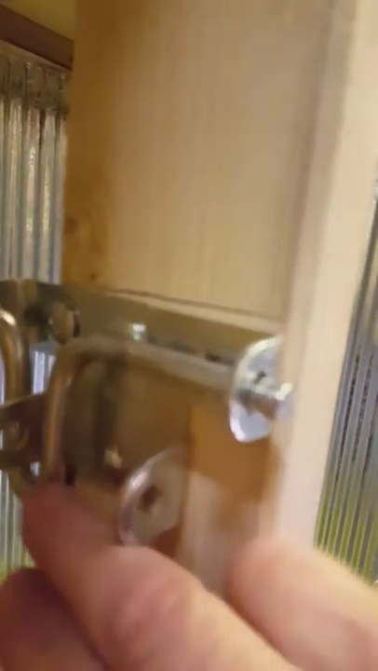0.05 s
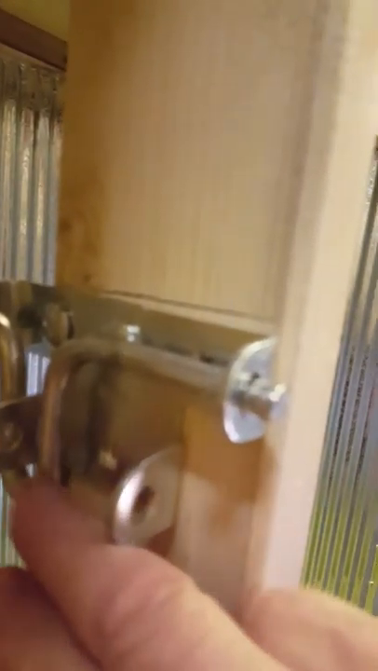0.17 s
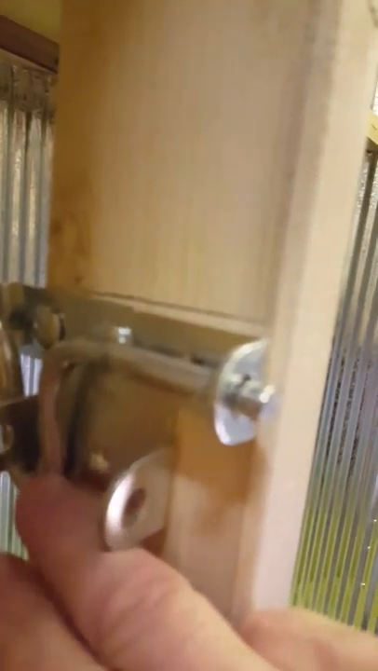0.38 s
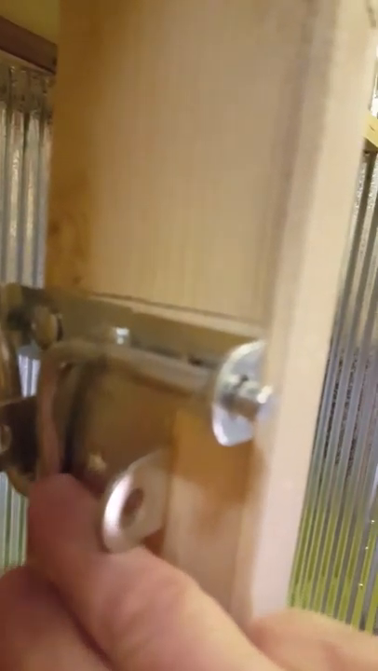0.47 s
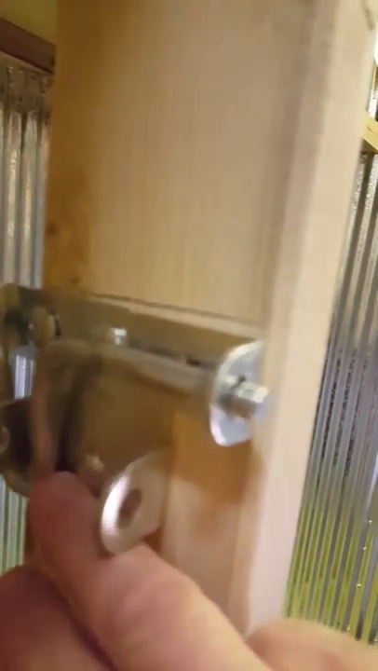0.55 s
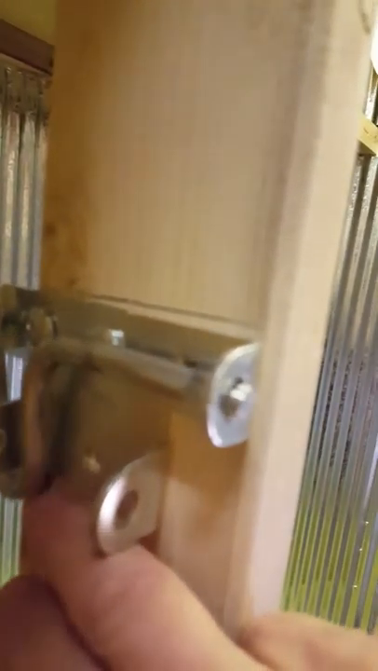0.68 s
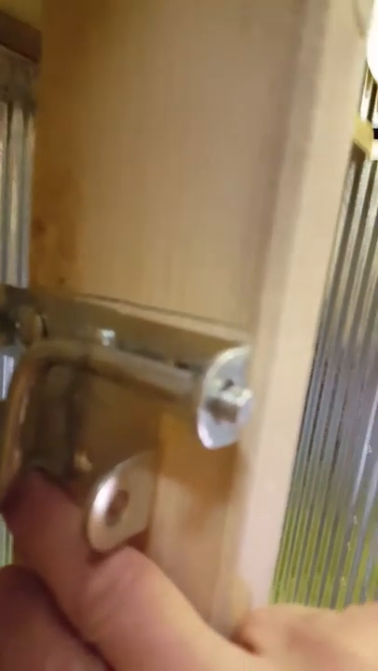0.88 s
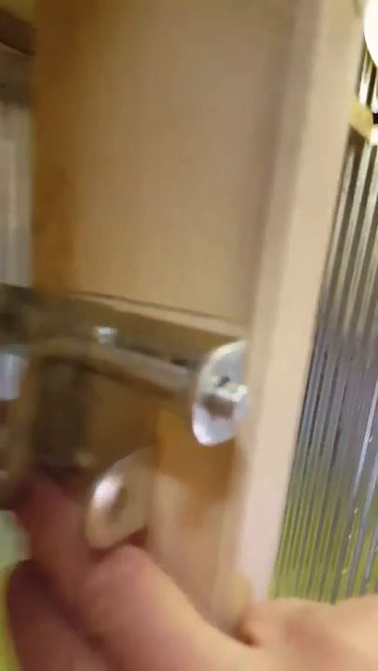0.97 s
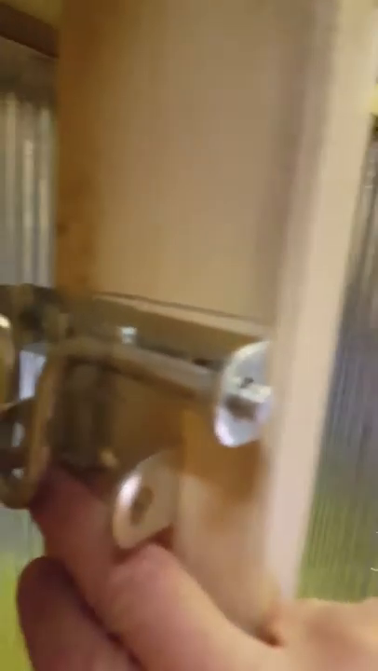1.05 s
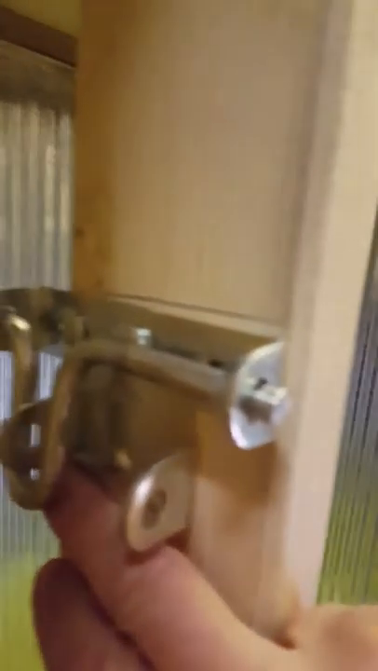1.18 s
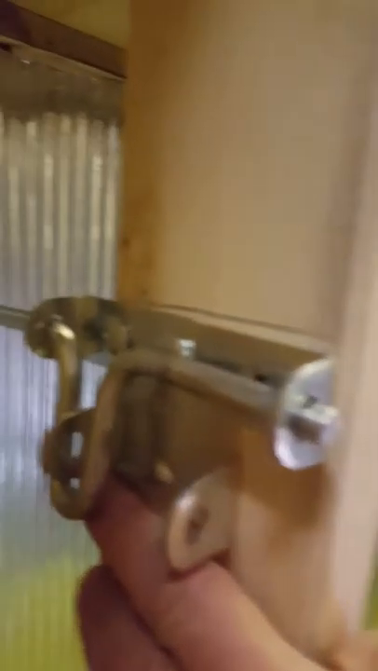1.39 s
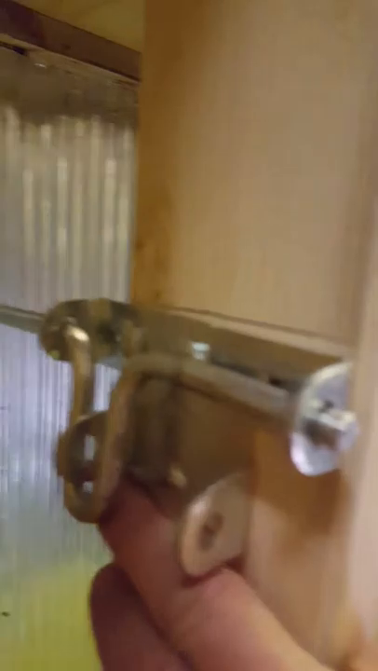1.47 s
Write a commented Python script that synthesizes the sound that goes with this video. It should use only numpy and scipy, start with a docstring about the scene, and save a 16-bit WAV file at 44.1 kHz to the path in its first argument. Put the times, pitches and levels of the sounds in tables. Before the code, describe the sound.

Steel bolt latch snaps sharply against its stop, then rattles, knocks wood and slides; hand rubs follow

```python
"""A steel bolt latch on a wooden gate frame, close to a two-port microphone indoors. A soft low bump opens over
room rumble, faint tones and hiss, all noise and sines. A light tap, then the bolt snaps against its stop: decaying
modes and noise bursts, answered by a small room of dying noise. From about 0.47 s it rattles, knocks the frame and
slides, random slips ringing the same modes. From 0.72 s a hand rubs the wood three times, random grains through broad
resonances; one faint latch tap falls before the last rub."""
import sys
import numpy as np
from scipy import signal
from scipy.fft import rfft, irfft, next_fast_len
from scipy.io import wavfile
from scipy.ndimage import map_coordinates

SR = 44100
rng = np.random.default_rng(int(sys.argv[2]) if len(sys.argv) > 2 else 0)


def voltage_ratio(level):
    """Linear amplitude factor for a level in decibels (scalar or array-like)."""
    return 10 ** (np.asarray(level, float) / 20)


def put_to_file(sound):
    """Save the sound as 16-bit audio at rate SR, in the file named by the first command-line argument."""
    columns = np.atleast_2d(sound).T  # one column per channel
    safe = np.clip(columns, -1, 1)
    whole_steps = np.round(safe * 32767)
    wavfile.write(sys.argv[1], SR, whole_steps.astype(np.int16))


N = 66150

# soft low bump on the microphone
THUMP_S, THUMP_DB, THUMP_HZ, THUMP_T60_S = 0.002, -35, 141, 0.011
# room rumble spectrum, relative: (frequency [Hz], level [dB])
FLOOR_SPECTRUM = [(12, -40), (20, -16), (55, -7), (98, -9.5), (132, -6.5), (398, -15), (450, -12),
                  (484, -12.5), (547, -18), (1320, -23), (1610, -23), (7000, -38.5), (9100, -61),
                  (15400, -120)]
# room rumble over time, before a 2 dB cut: (time [s], level [dB])
FLOOR_LEVEL = [(0.0, -58.5), (0.27, -60), (0.416, -59.5), (0.752, -55.5), (1.198, -61), (1.5, -61)]
# left-right likeness of the room rumble: (frequency [Hz], correlation [-1 to 1])
FLOOR_LIKENESS = [(40, .85), (130, .8), (290, .64), (640, .28), (1400, 0), (15000, 0)]
# faint steady tones, peak level before a 1 dB lift: (frequency [Hz], level [dB])
HUM_TONES = [(118.4, -79), (1362, -83)]
# low handling rumble
RUMBLE_DB, RUMBLE_SWING_DB, RUMBLE_HZ = -71.5, 4, 102
# microphone self-noise spectrum, relative: (frequency [Hz], level [dB])
MIC_HISS = [(3530, -32), (6000, -5.5), (10200, -4.5), (11200, -2), (14900, 2.5), (15900, -5), (16200, -22),
            (16500, -25.5)]
MIC_HISS_DB = -77

# bolt contacts; wood pitch is the one favoured by the spot struck:
# (time [s], steel level [dB], wood level [dB], hardness [Hz], wood pitch [Hz])
CONTACTS = [(0.177, -54, -53.5, 5040, 497), (0.2072, -15, -26.5, 15600, 560),
            (0.2136, -24.5, -43, 7100, 523), (.219, -21.5, -29, 9000, 450),
            (0.227, -29.5, -24.5, 4930, 386), (0.4679, -39, -47, 11850, 691), (.477, -36, -34.5, 8000, 636),
            (.494, -42.5, -47, 3500, 608), (.500, -37, -28, 2850, 620), (.506, -40, -29.5, 2950, 620),
            (0.5212, -47, -27.5, 9000, 419.4), (0.5401, -36, -36, 7900, 530),
            (0.549, -35.5, -36, 5760, 560), (.565, -53, -36, 10000, 420), (.580, -43, -43.5, 2550, 450),
            (0.968, -58, -83, 6050, 500)]
# bolt and plate modes: (frequency [Hz], level [dB], t60 [s])
STEEL_MODES = [(1114, 0.5, 0.077), (1276, -8, 0.08), (1520, -4.5, 0.082), (1861, -5, 0.15),
               (2233, -7.5, 0.11), (2390, -10, 0.07), (2553, -4, .08), (2630, 2, .07), (2910, -5, 0.11),
               (3214, -4, 0.096), (3366, 4, 0.04), (3740, -9, .06), (4020, -3, 0.06), (4760, -16.5, 0.027),
               (5630, -7, 0.03), (6360, -8.5, 0.02), (6420, -10, 0.05), (7160, -16, 0.04),
               (8130, -12, 0.043), (10920, 0, 0.016), (12100, -4.5, 0.012)]
# wooden frame modes: (frequency [Hz], level [dB], t60 [s])
WOOD_MODES = [(359, -13, .1), (398, 0.5, .1), (429.3, -4, 0.11), (465.5, -4, 0.083), (538.7, -8, 0.098),
              (581, -2.5, 0.1), (698, -2.5, 0.07), (879, -11.5, 0.08), (1000, -4.5, 0.15)]
# low modes of the whole gate, moved by the force of the steel blow: (frequency [Hz], level [dB], t60 [s])
GATE_MODES = [(131, -17.5, 0.2), (175.5, -14.5, 0.13), (232.5, -8, 0.25), (272.3, -8.5, 0.19),
              (325, -16, .3)]
# dense plate overtones, relative: (frequency [Hz], level [dB])
CLANK_SPECTRUM = [(290, -44), (500, 3.5), (820, -12.5), (1090, -6), (1370, -16), (1840, -2.5), (6380, -17),
                  (8670, -39), (12000, -18), (15800, -25), (16500, -61)]
# decay of the plate overtones: (frequency [Hz], t60 [s])
CLANK_T60 = [(600, 0.069), (2000, 0.11), (4000, 0.049), (8000, 0.12), (15000, 0.1)]
# decay of the contact click: (frequency [Hz], t60 [s])
CLICK_T60 = [(1000, .012), (14000, 0.0085)]
# stereo lean of the ringing modes: (frequency [Hz], left over right [dB])
LATCH_LEAN = [(60, -1), (110, 4), (200, 3), (380, 2), (700, 0.5), (1290, 0), (2380, 7), (4400, -3),
              (8120, -4.5), (15000, -8)]
STEEL_RISE_S, WOOD_RISE_S, GATE_RISE_S = 0.000081, 0.00058, 0.024
LATCH_LAG_S, WOOD_LAG_S, RUB_LAG_S = .00014, .00009, .00008  # left port behind right
MODE_SCATTER_DB = 2  # from blow to blow
SPOT_SCATTER_S = .00005  # where on the part a mode radiates
DETUNE = .003  # loose parts shift the pitches, as a share of each
BLUR = .004  # rattling joints widen each mode by this share of its pitch
SPOT_OCTAVES = 0.44  # spread of wood pitches favoured by a blow; the slide uses half of it
RADIATES_ABOVE_HZ = 260  # the narrow frame sounds weakly below
CLANK_DB, CLICK_DB, CLANK_LEAN_DB = -7.5, -1, -5.5
# light taps hardly set the plate going: extra dB lost per dB below a hard blow
CLANK_GROWS, HARD_BLOW_DB = 0.22, -14.5

# decay of the room answer: (frequency [Hz], t60 [s])
ROOM_T60 = [(150, 0.41), (350, 0.25), (2000, 0.27), (6000, 0.23), (14000, 0.12)]
ROOM_DB = -15

# the bolt drags through its guide: (time [s], steel level [dB], wood level [dB])
SLIDE = [(.468, -54, -74), (.49, -58, -60), (.56, -60, -58.5), (.60, -73.5, -60.5), (.635, -78.5, -57),
         (.685, -78, -60), (.72, -89, -74)]
SLIPS_PER_S, SLIDE_TOP_HZ = 2000, 3500
SLIDE_WOOD_HZ = (440, 487)  # the struck spot moves along the frame
GRIT_DB = 0  # each slip also clicks

# hand pressure, one list per stroke: (time [s], level [dB])
RUB_STROKES = [
    [(0.72, -70), (0.724, -65), (0.732, -68), (0.75, -67.5), (0.79, -58), (0.84, -77.5)],
    [(0.855, -67.5), (0.875, -53.5), (0.931, -42), (0.939, -45.5), (0.955, -93)],
    [(1.015, -66.5), (1.043, -53), (1.075, -47), (1.125, -67)],
]
# broad resonances of the rubbed wood: (frequency [Hz], width [Hz], level [dB])
RUB_BODY = [(208.5, 20, -2.5), (450, 97, -1.5), (860, 200, 2), (1150, 420, -5), (1446, 220, -10),
            (2950, 920, -26)]
# rubbing hiss spectrum, relative: (frequency [Hz], level [dB])
RUB_HISS = [(1500, -120), (2500, 5.5), (5000, 10), (8500, -8.5), (12500, 4), (16500, -17)]
RUB_HISS_DB, RUB_LEAN_DB, GRAINS_PER_S = -25.5, 8, 3000
RUB_APART = 0.37  # share of each port's own grains beside the common ones

MIC_NOTCH_HZ, MIC_NOTCH_WIDTH_HZ, MIC_NOTCH_DEPTH, MIC_TOP_HZ = 9000, 900, 0.46, 16700


def unit(x):
    """Brings a signal to rms 1."""
    return x / np.sqrt(np.mean(x ** 2) + 1e-20)


def along(points, hz):
    """Reads (Hz, value) points on a log frequency axis."""
    f, v = np.transpose(points)
    return np.interp(np.log(hz + 1), np.log(f + 1), v)


def filtered(x, response):
    """Shapes x by a complex response of frequency."""
    m = next_fast_len(N + SR // 2)
    return irfft(rfft(x, m) * response(np.fft.rfftfreq(m, 1 / SR)), m)[..., :N]


def sides(db):
    """Left and right gains for a lean in dB."""
    return voltage_ratio(np.multiply.outer([.5, -.5], db))


def ports(lag_s, hz):
    """Phase by which the left port hears later than the right."""
    return np.exp(-1j * np.pi * lag_s * hz * np.array([[1], [-1]]))


def dying(t60s, spectrum, channels):
    """Noise that starts at once; each frequency dies at its own speed."""
    noise = rng.standard_normal((channels, SR // 2 + 64))
    hz, t, z = signal.stft(noise, SR, nperseg=64)
    level_db = along(spectrum, hz)[:, None] - 60 * t / along(t60s, hz)[:, None]
    return signal.istft(z * voltage_ratio(level_db), SR, nperseg=64)[1][:, 64:SR // 2 + 64]


def ring(modes, favour, rise_s, lag_s, sense):
    """Stereo ringing of one blow as decaying sines; sense -1 makes neighbouring modes start opposed."""
    hz, db, t60 = np.transpose(modes)[..., None]
    t = np.arange(SR // 2) / SR
    size, spot, shift = rng.standard_normal((3, len(modes), 1))
    hz = hz * (1 + DETUNE * shift)
    decay = voltage_ratio(db + MODE_SCATTER_DB * size - 60 * t / t60)
    sign = sense ** np.arange(len(modes))[:, None]
    gain = decay * favour(hz) * sign * (1 - np.exp(-t / rise_s))
    # a random walk in phase widens each mode
    wander = np.sqrt(2 * np.pi * BLUR * hz / SR) * np.cumsum(rng.standard_normal(gain.shape), 1)
    late = lag_s / 2 + SPOT_SCATTER_S * spot
    left_right = []
    for side, lean in zip((1, -1), sides(along(LATCH_LEAN, hz))):
        tones = np.sin(2 * np.pi * hz * (t - side * late) + wander)
        left_right.append(np.sum(lean * gain * tones, 0))
    return np.array(left_right)


def thump():
    """One low push on the microphone: a sine that dies within milliseconds."""
    t = np.clip(np.arange(N) / SR - THUMP_S, 0, None)
    return -voltage_ratio(THUMP_DB - 60 * t / THUMP_T60_S) * np.sin(2 * np.pi * THUMP_HZ * t)


def floor():
    """Room rumble as shaped noise, near mono in the bass, with faint steady tones."""
    t = np.arange(N) / SR

    def mid_side(hz):
        turn = np.arccos(np.clip(along(FLOOR_LIKENESS, hz), -1, 1)) / 2
        return voltage_ratio(along(FLOOR_SPECTRUM, hz)) * [np.cos(turn), np.sin(turn)]

    mid, side = filtered(rng.standard_normal((2, N)), mid_side)
    noise = unit(np.array([mid + side, mid - side]))
    hum = sum(voltage_ratio(db + 1) * np.sin(2 * np.pi * (hz * t + rng.random())) for hz, db in HUM_TONES)
    return voltage_ratio(np.interp(t, *np.transpose(FLOOR_LEVEL)) - 2.0) * noise + hum


def rumble():
    """A low rumble swells unevenly on random control points; the capsules hiss."""
    swell = map_coordinates(rng.standard_normal(20), [np.arange(N) * 10 / SR])  # 10 points per second
    low = unit(filtered(rng.standard_normal(N), lambda hz: hz / (1 + (hz / RUMBLE_HZ) ** 4)))
    hiss = unit(filtered(rng.standard_normal((2, N)), lambda hz: voltage_ratio(along(MIC_HISS, hz))))
    return voltage_ratio(RUMBLE_DB + RUMBLE_SWING_DB * swell) * low + voltage_ratio(MIC_HISS_DB) * hiss


def latch():
    """Each contact clicks, rings the steel, clanks the plate, knocks the frame and shakes the gate."""
    out, lag = np.zeros((2, N + SR)), round(LATCH_LAG_S * SR)
    narrow = signal.butter(2, RADIATES_ABOVE_HZ, "highpass", fs=SR, output="sos")
    for s, steel_db, wood_db, top_hz, wood_hz in CONTACTS:
        clank = dying(CLANK_T60, CLANK_SPECTRUM, channels=1)[0]
        click = dying(CLICK_T60, CLANK_SPECTRUM, channels=1)[0]
        clank_gain = voltage_ratio(CLANK_DB + CLANK_GROWS * (steel_db - HARD_BLOW_DB))
        noise = clank_gain * clank / np.std(clank[:400]) + voltage_ratio(CLICK_DB) * click / np.std(click[:100])

        # softer contacts lose treble
        band = signal.butter(2, [500, min(top_hz, 20000)], "bandpass", fs=SR, output="sos")
        burst = signal.sosfilt(band, noise)
        burst = sides(CLANK_LEAN_DB)[:, None] * [np.pad(burst, (lag, 0))[:len(burst)], burst]

        steel = ring(STEEL_MODES, lambda hz: .5 / (1 + (hz / top_hz) ** 2),
                     STEEL_RISE_S, LATCH_LAG_S, sense=-1.)
        wood = ring(WOOD_MODES, lambda hz: np.exp(-.5 * (np.log2(hz / wood_hz) / SPOT_OCTAVES) ** 2),
                    WOOD_RISE_S, WOOD_LAG_S, sense=1.)
        gate = ring(GATE_MODES, lambda hz: .5, GATE_RISE_S, WOOD_LAG_S, sense=-1.)
        blow = voltage_ratio(steel_db) * (burst + steel + gate) + voltage_ratio(wood_db) * signal.sosfilt(narrow, wood)
        out[:, round(s * SR):][:, :SR // 2] += blow
    return out[:, :N]


def room(x):
    """A small room answers a few milliseconds late with a tail of dying noise."""
    tail = dying(ROOM_T60, [(100, 0)], channels=2)
    late = np.pad(x, ((0, 0), (250, 0)))
    return signal.fftconvolve(late, tail / np.linalg.norm(tail[0]), axes=1)[:, :N]


def slide():
    """Tiny random slips click and ring the same steel and frame modes."""
    t, (s, steel_db, wood_db) = np.arange(N) / SR, np.transpose(SLIDE)
    slips = (rng.random((2, N)) < SLIPS_PER_S / SR) * rng.standard_normal((2, N))
    steel = ring(STEEL_MODES, lambda hz: 1 / (1 + (hz / SLIDE_TOP_HZ) ** 4),
                 STEEL_RISE_S, LATCH_LAG_S, sense=-1.)
    near, far = (ring(WOOD_MODES, lambda hz: np.exp(-2 * (np.log2(hz / spot) / SPOT_OCTAVES) ** 2),
                      WOOD_RISE_S, WOOD_LAG_S, sense=-1.) for spot in SLIDE_WOOD_HZ)
    grit = dying(CLICK_T60, CLANK_SPECTRUM, channels=2)
    steel = steel + voltage_ratio(GRIT_DB) * grit / np.std(grit[:, :100])

    def drag(row, db, body):
        level = voltage_ratio(np.interp(t, s, db, left=-120, right=-120))
        return signal.fftconvolve((row * level)[None], body, axes=1)[:, :N]

    moved = np.interp(t, s[[0, -1]], [0, 1]) ** 2  # from the near spot to the far one
    frame = drag(slips[1] * (1 - moved), wood_db, near) + drag(slips[1] * moved, wood_db, far)
    return drag(slips[0], steel_db, steel) + frame


def rubbing():
    """Skin catches and slips: grains into the wood's broad resonances, with a faint hiss."""
    t = np.arange(N) / SR
    stroke = sum(voltage_ratio(np.interp(t, *np.transpose(rows), left=-120, right=-120)) for rows in RUB_STROKES)
    grains = (rng.random((3, N)) < GRAINS_PER_S / SR) * rng.uniform(-0.95, 1, (3, N))
    pair = grains[0] + RUB_APART * grains[1:]

    def body(f):
        total = 0
        for k, (centre, width, db) in enumerate(RUB_BODY):  # neighbours have opposed signs
            damping = 1j * f * width
            total = total + (-1) ** k * voltage_ratio(db) * damping / (centre * centre - f * f + damping)
        return total

    scale = np.std(filtered(pair, body))
    hiss = unit(filtered(rng.standard_normal((2, N)), lambda hz: voltage_ratio(along(RUB_HISS, hz))))
    rub = filtered(stroke * pair / scale, lambda hz: body(hz) * ports(RUB_LAG_S, hz))
    return sides(RUB_LEAN_DB)[:, None] * (rub + voltage_ratio(RUB_HISS_DB) * stroke * hiss)


def scene():
    """All sources at the microphone; the room answers the latch, the slide and the hand."""
    near = latch() + slide() + rubbing()
    return near + voltage_ratio(ROOM_DB) * room(near) + thump() + floor() + rumble()


def roll_off(x):
    """The treble ends steeply here."""
    return signal.sosfilt(signal.butter(12, 16830, fs=SR, output="sos"), x)


def record(dry):
    """The microphone port dips in the treble, and the band ends sharply at the top."""
    depth = np.clip(MIC_NOTCH_DEPTH, 0, 1)

    def microphone(f):
        damping = 1j * f * MIC_NOTCH_WIDTH_HZ
        dip = 1 - depth * damping / (MIC_NOTCH_HZ ** 2 - f * f + damping)
        return (f < MIC_TOP_HZ) * dip

    mix = filtered(dry, microphone)
    return roll_off(mix)


dry = scene()
out = record(dry)
put_to_file(out)
```